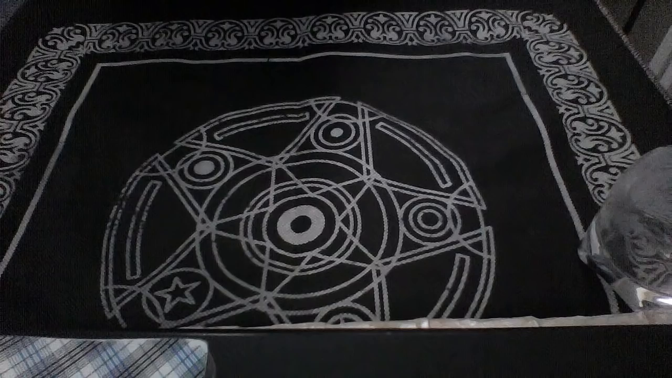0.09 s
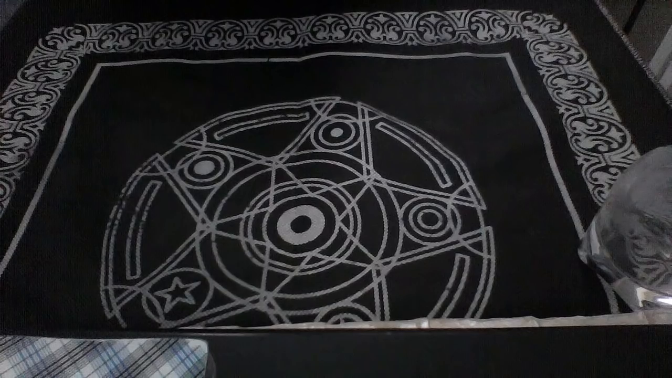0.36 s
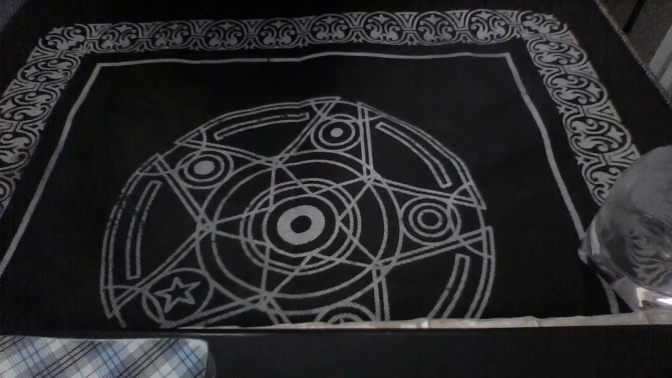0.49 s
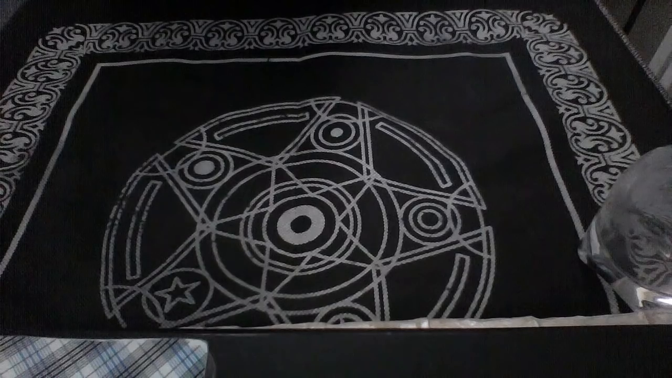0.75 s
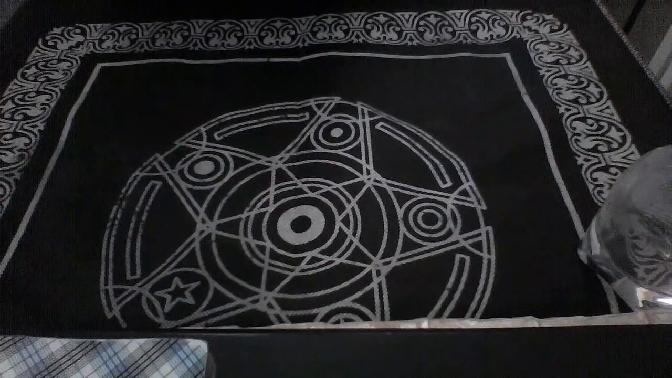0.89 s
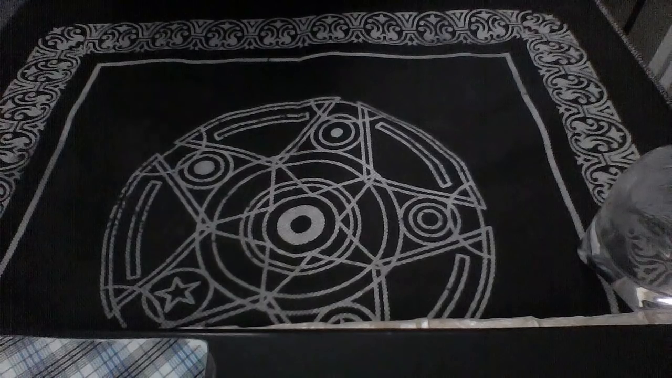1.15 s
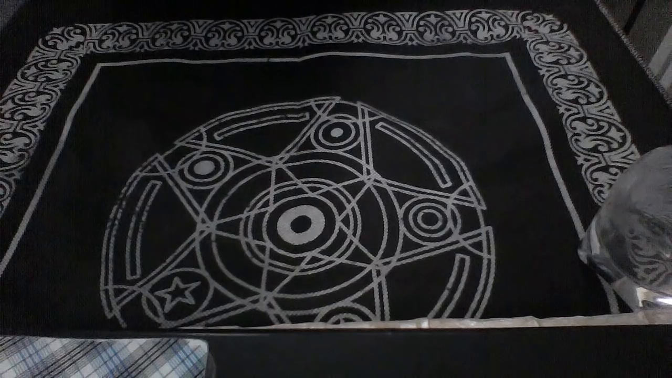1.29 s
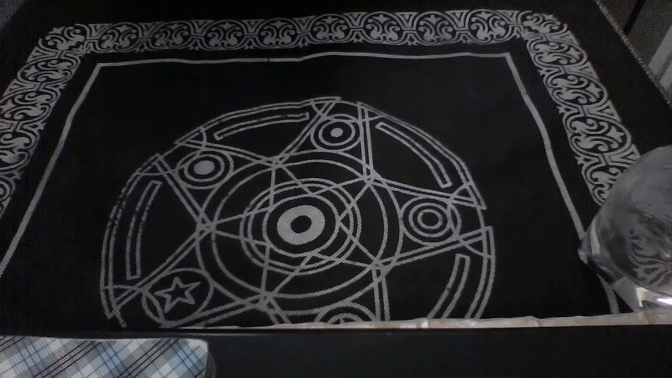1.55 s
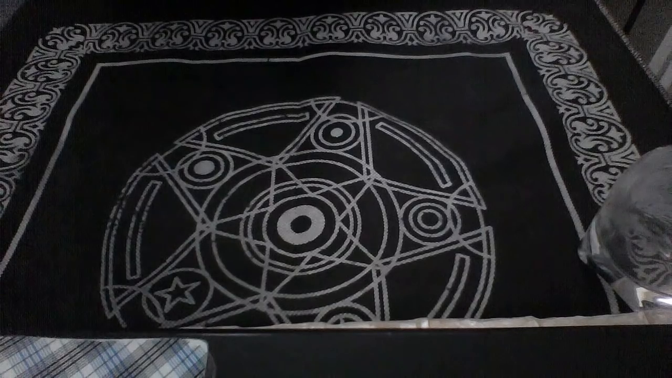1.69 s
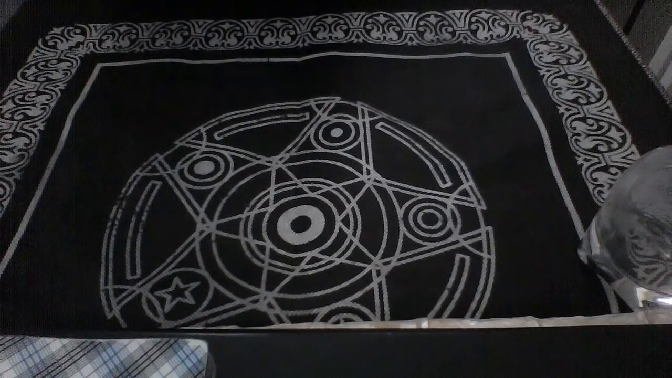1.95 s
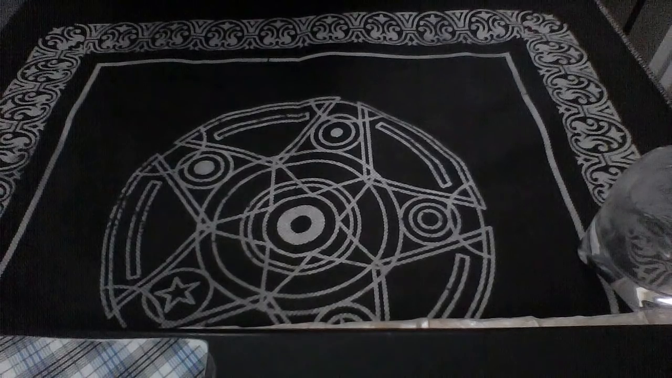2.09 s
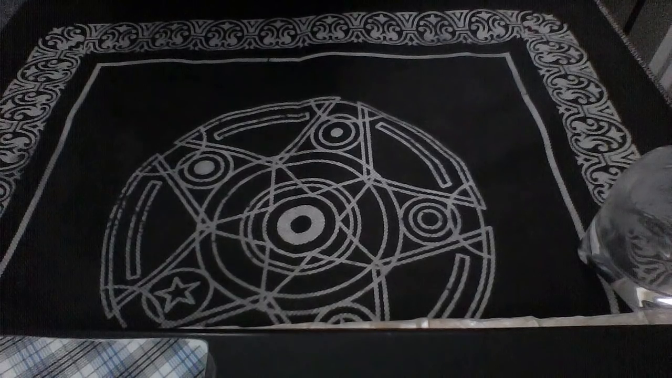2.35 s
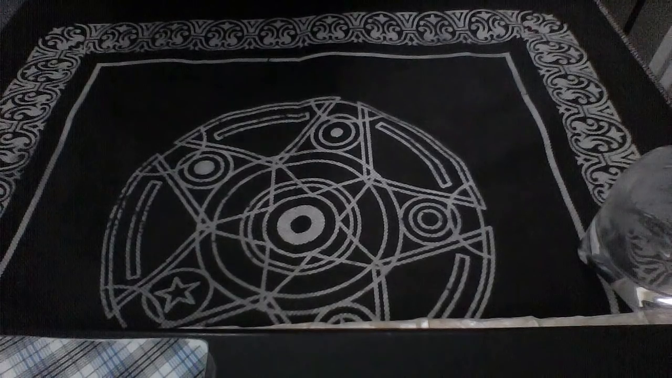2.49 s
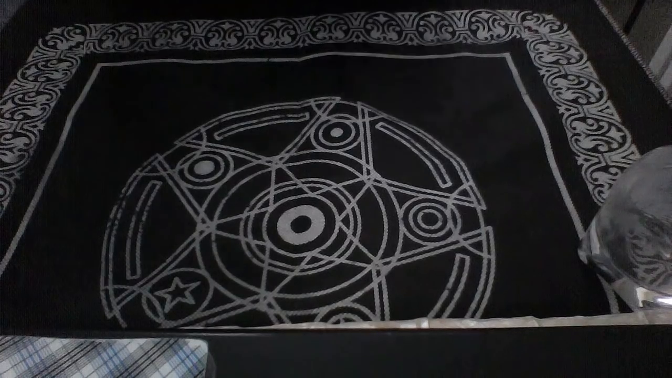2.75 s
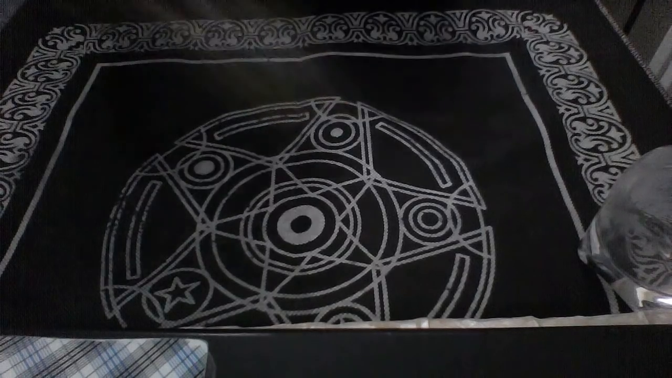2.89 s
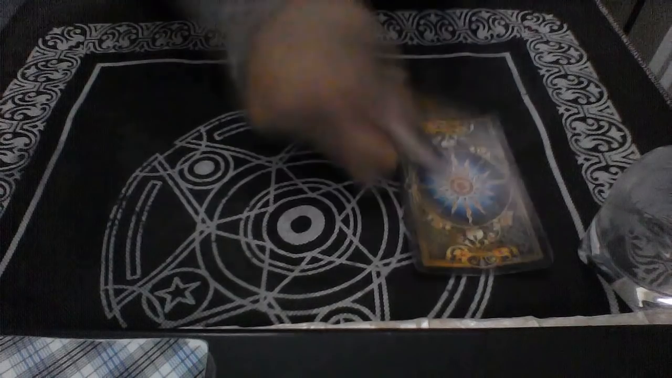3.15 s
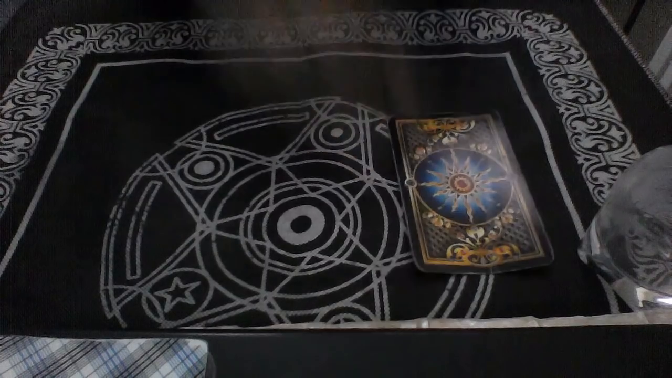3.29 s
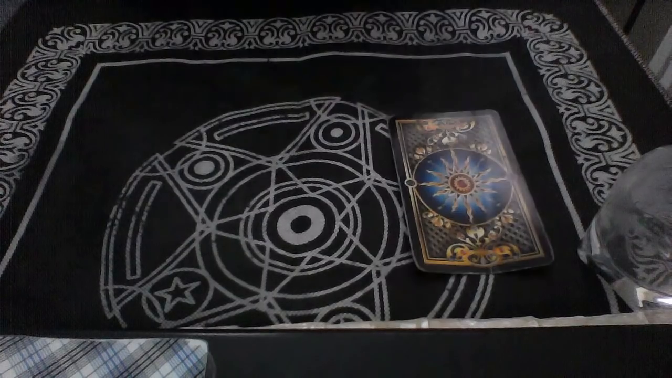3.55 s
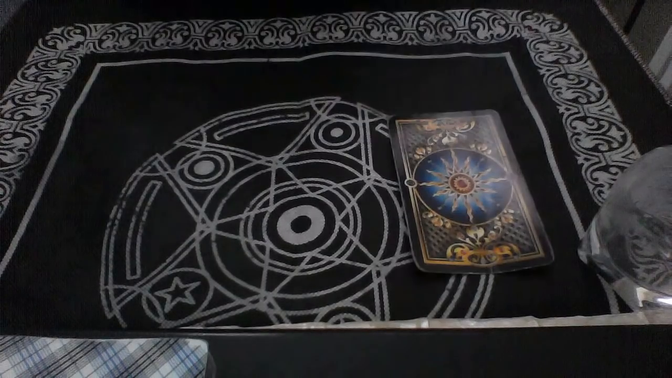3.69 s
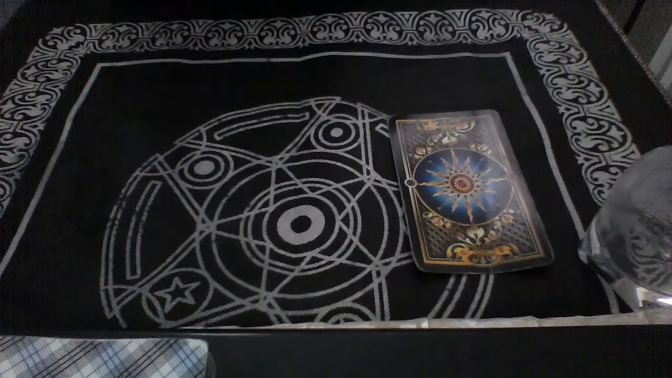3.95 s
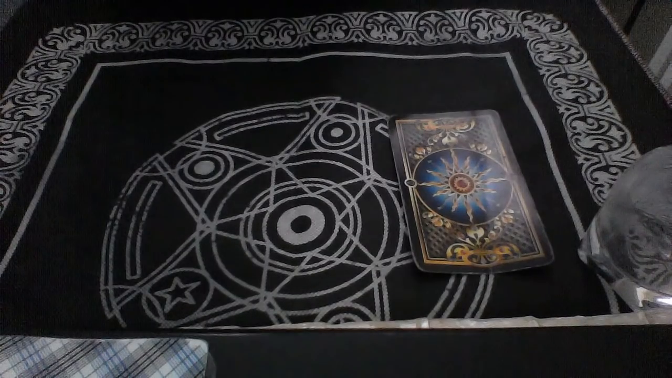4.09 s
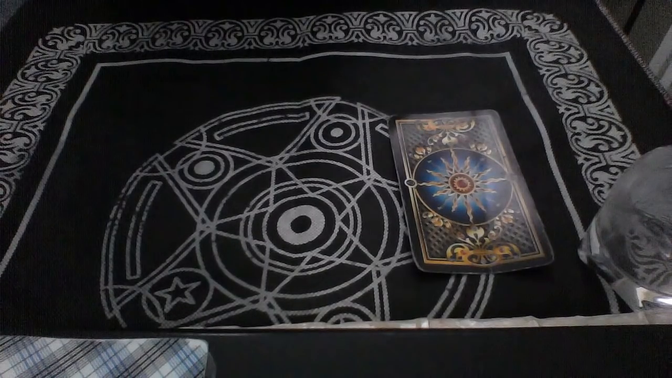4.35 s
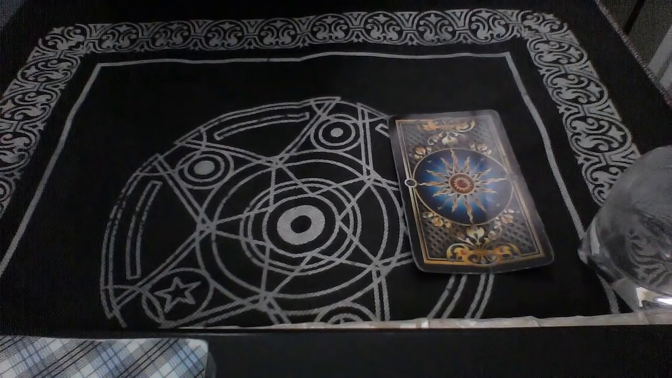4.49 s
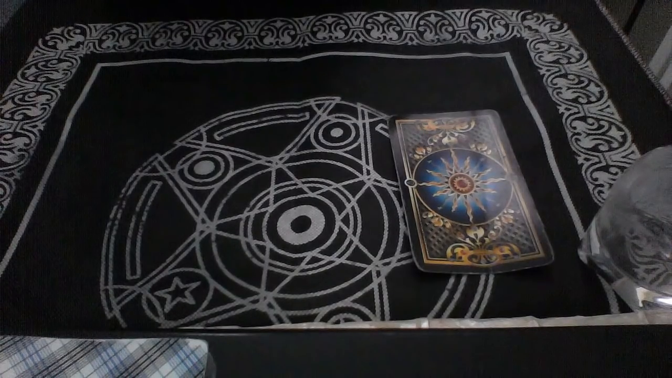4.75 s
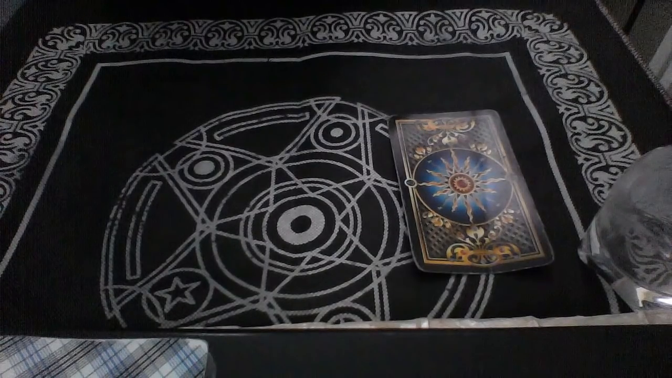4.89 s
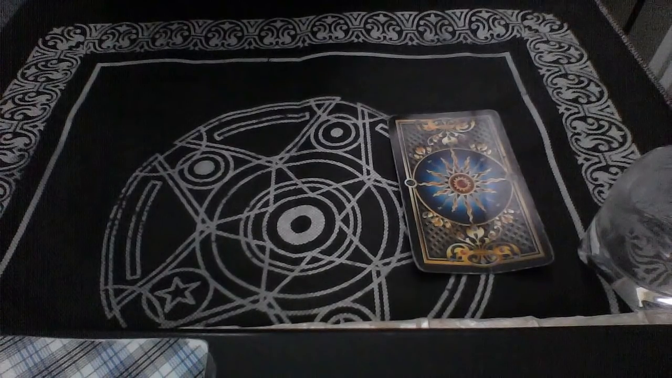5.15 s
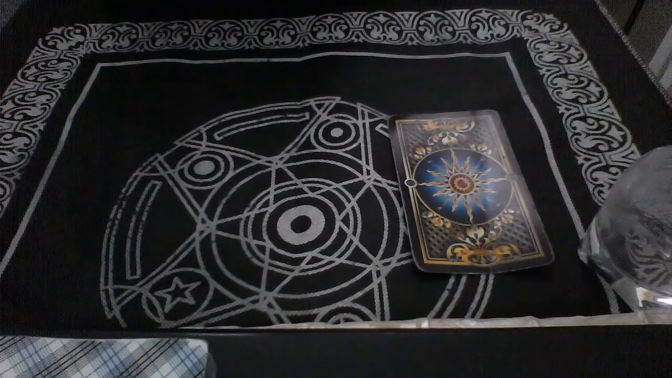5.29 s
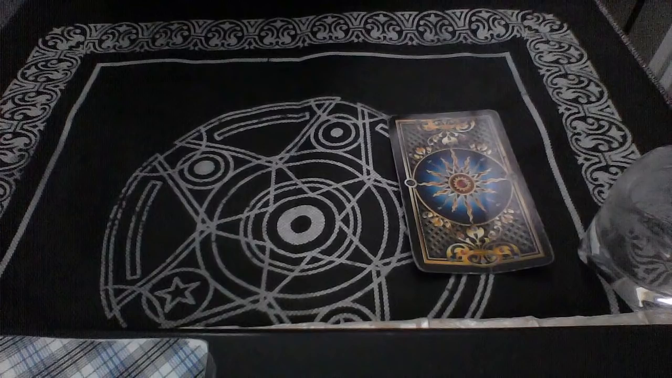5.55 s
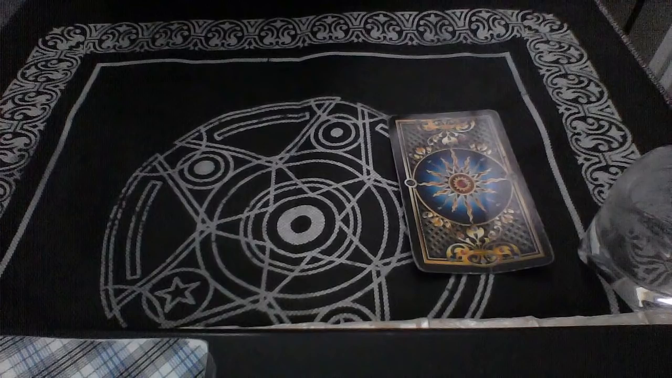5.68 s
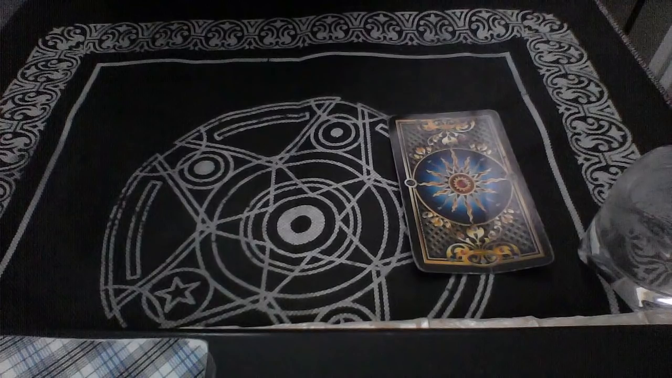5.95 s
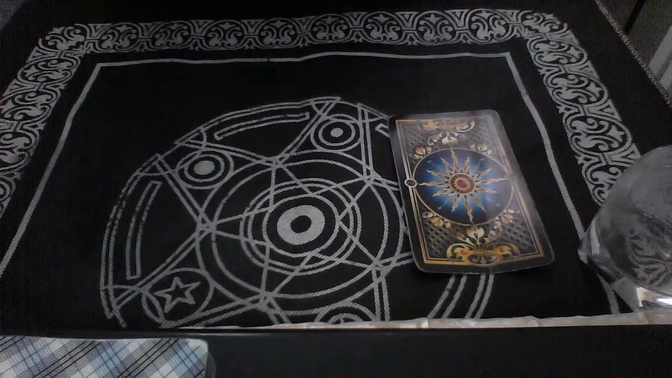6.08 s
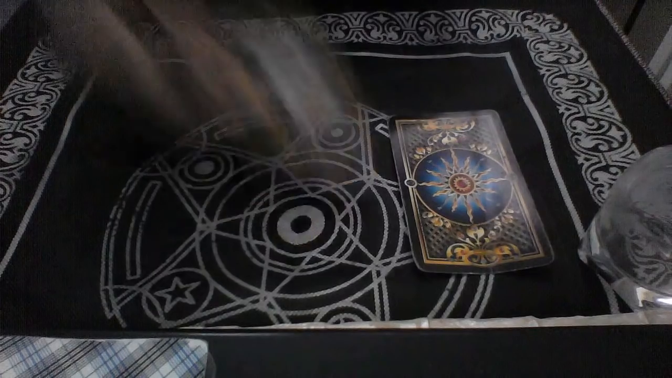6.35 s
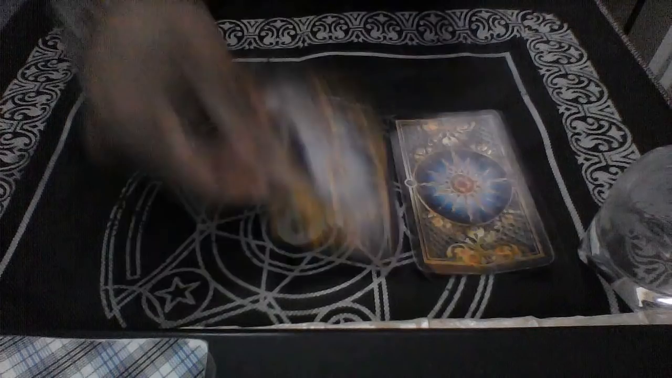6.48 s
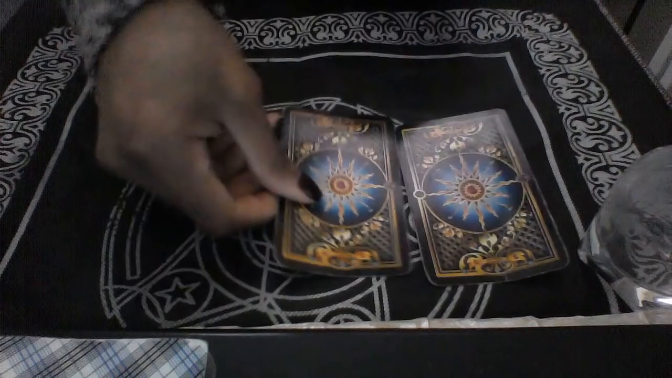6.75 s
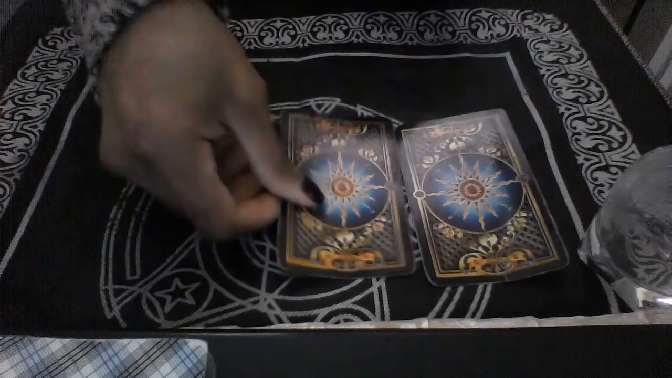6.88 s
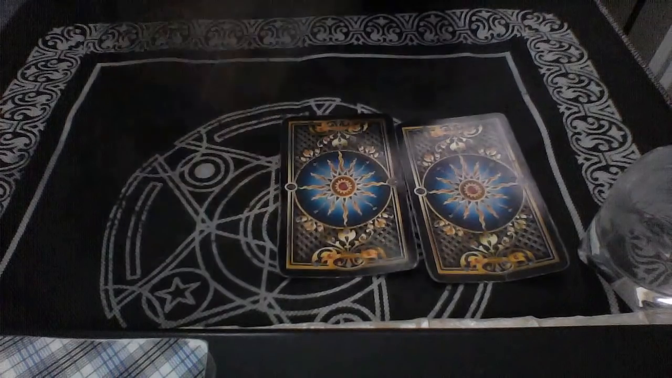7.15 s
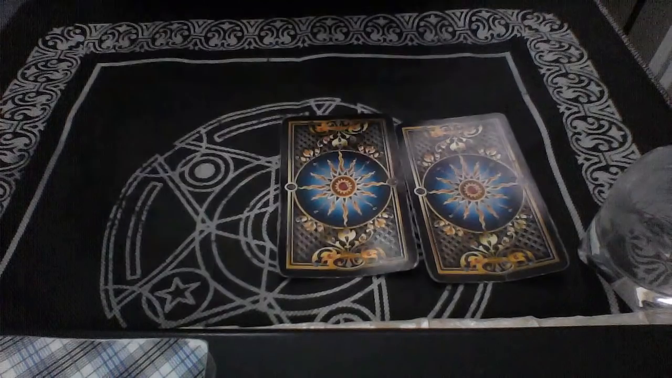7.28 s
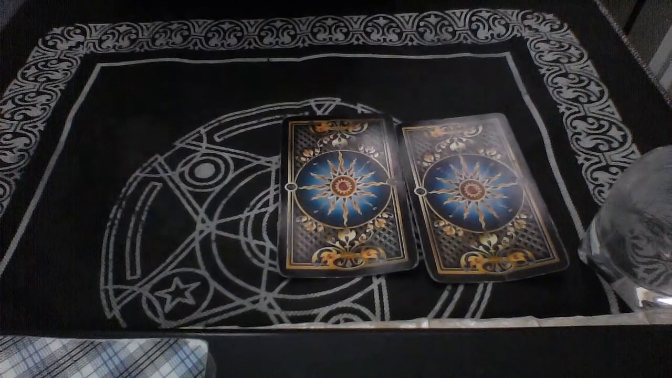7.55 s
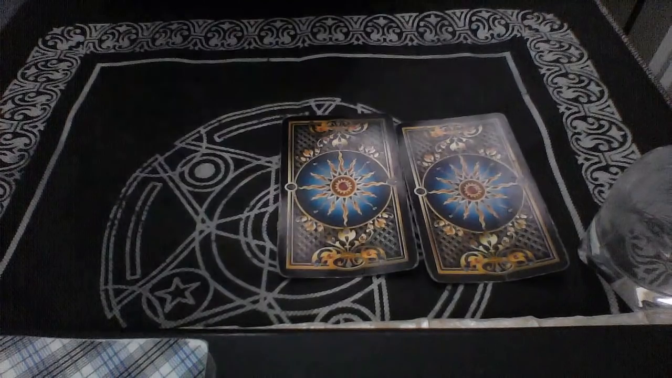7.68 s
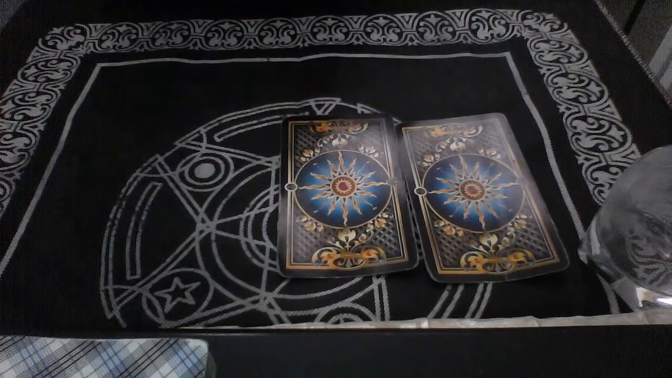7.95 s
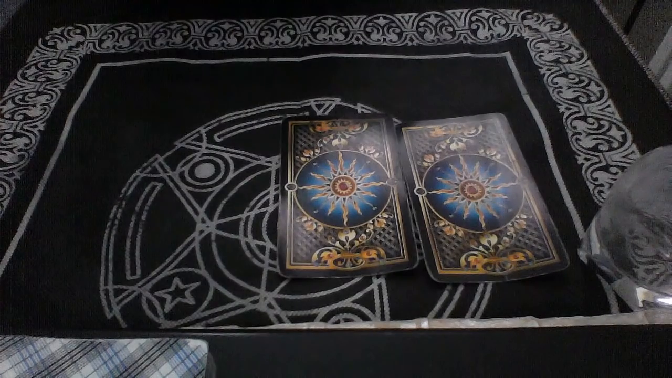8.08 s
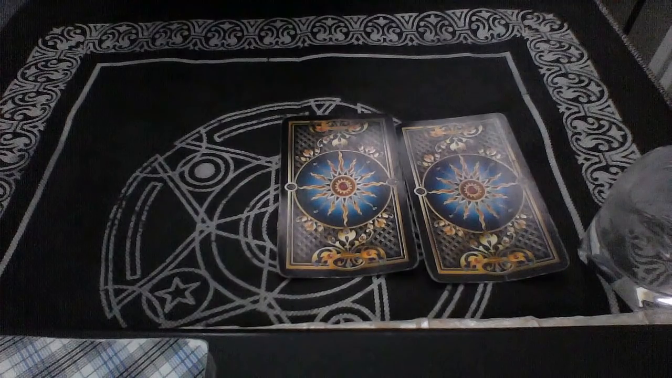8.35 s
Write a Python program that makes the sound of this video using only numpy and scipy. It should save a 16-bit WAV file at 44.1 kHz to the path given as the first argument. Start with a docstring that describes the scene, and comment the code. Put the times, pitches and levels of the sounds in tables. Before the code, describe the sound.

Steady soft fan whir and low rumble indoors. Close by, card edges tick, snap and knock unevenly, each with a brief woody ring, while packets rub with tiny scratchy hisses. A strong burst comes early, then a card is laid down, steady shuffling follows, another card is laid, a short lull passes, and a hard clack with a dull table boom leads into final clicks.

```python
"""Shuffling a deck of cards

Stiff cards are shuffled near a camera: edges snap and knock as a released card rings the deck in the hands.
Packets hiss as they slide over each other: noise full of tiny catches follows the speed of each stroke.
Soft pushes make a cloth-covered table top boom, as a sum of fading tones.
Behind it a computer fan whirs with a few steady tones, over low room rumble and a fitful rustle."""
import sys
import numpy as np
from scipy import signal
from scipy.fft import rfft, irfft, next_fast_len
from scipy.io import wavfile
from scipy.ndimage import uniform_filter1d, map_coordinates

SR = 44100
rng = np.random.default_rng(int(sys.argv[2]) if len(sys.argv) > 2 else 0)


def unload_wav(signal):
    """Save mono or channel-first audio to the path in sys.argv[1] as 16-bit WAV at rate SR, clipped to [-1, 1]."""
    wavfile.write(
        sys.argv[1],
        SR,
        np.round(np.clip(np.atleast_2d(signal).T, -1, 1) * 32767).astype(np.int16),
    )


N = 373527  # length of the scene in samples

# Fan hiss, its colour before overall scaling: (frequency [Hz], relative level [dB])
FAN_HISS = [(76, -47), (130, -25), (176, -15), (253, -6.5), (300, -17), (380, -7.5), (444, -13), (522, -12),
            (664, -7), (765, -9.5), (1290, -7.5), (1520, -9.5), (2010, -12), (2700, -15.5), (4000, -20),
            (7000, -22.5), (16000, -23)]
# Fan tones: (multiple of the shaft rate, average level [dB])
FAN_TONES = [(13, -54), (14, -57), (15, -61), (16, -57.5), (24, -62), (31, -64), (32, -62), (49, -65)]
# Low room rumble, its colour before overall scaling: (frequency [Hz], relative level [dB])
ROOM_RUMBLE = [(4.7, -52), (8.0, 0.5), (27, -4), (50, -10.5), (65, -12.5), (94, -11), (161, -27),
               (177, -34), (200, -42), (260, -47), (440, -120)]
# How long the room rings: (frequency [Hz], time to fall 60 dB [s])
ROOM_DECAY = [(200, 0.34), (1500, 0.16), (10000, 0.075)]
# Pushes on the table top: (time [s], strength [dB], contact length [s])
TABLE_PUSHES = [(.70, -27.5, 0.0068), (3.167, -20.5, 0.0017), (4.078, -34.5, 0.0032), (6.938, -13, 0.0024),
                (7.83, -10, 0.015), (8.062, -40.5, 0.0032)]
# Tones of the table top: (frequency [Hz], relative level [dB], time to fall 60 dB [s])
TABLE_MODES = [(61.7, -40, 0.16), (113.3, 1.5, 0.25), (212, 0, 0.11), (265, 0.5, 0.13), (318, 10.5, 0.059),
               (396, 5, 0.072)]
# Packets sliding: (start [s], length [s], fastest moment [share of length], level [dB], hiss centre [Hz])
CARD_SLIDES = [(0.083, 0.058, 0.49, -34, 1930), (0.616, 0.22, 0.21, -42, 1740),
               (0.706, 0.053, 0.11, -34.5, 1980), (0.851, 0.12, 0.43, -32, 2400),
               (0.972, 0.05, 0.85, -40.5, 2500), (1.268, 0.049, 0.17, -33.5, 1550),
               (1.487, 0.038, 0.25, -35.5, 2050), (1.516, 0.096, 0.042, -38, 1550),
               (1.599, 0.1, 0.4, -44.5, 1780), (1.772, 0.089, 0.63, -37.5, 1970),
               (1.854, 0.13, 0.11, -46, 1720), (2.193, 0.25, 1, -49.5, 2470),
               (2.59, 0.067, 0.57, -42.5, 1480), (2.664, 0.054, 0.05, -42, 1000),
               (2.716, 0.032, 0.11, -40, 1530), (2.815, 0.12, 0.5, -49.5, 4000),
               (3.062, 0.12, 0.7, -35, 2630), (3.412, 0.051, 0.83, -30, 2380),
               (3.649, 0.26, 0.18, -49.5, 3400), (3.973, 0.082, 0.84, -39, 2090),
               (4.055, 0.039, 0.46, -33.5, 1910), (4.272, 0.052, 0.3, -27, 2000),
               (4.327, 0.05, 0.52, -35, 1970), (4.492, 0.058, 0.74, -38, 1770),
               (4.561, 0.042, 0.37, -40, 3300), (4.595, 0.045, 0.6, -33, 1530),
               (4.789, 0.049, 0.2, -28, 1730), (4.85, 0.038, 0.48, -36, 1970),
               (5.028, 0.057, 0.25, -36.5, 2460), (5.092, 0.056, 0.89, -35.5, 2660),
               (5.3, 0.054, 0.31, -33.5, 2020), (5.336, .05, 0.96, -34.5, 2500),
               (5.572, 0.031, 0.12, -36.5, 1510), (5.608, 0.1, 0.29, -35, 2430),
               (5.657, 0.057, 0.26, -32.5, 1270), (5.969, 0.051, 0.35, -40.5, 1490),
               (6.093, 0.07, 0.93, -34.5, 2080), (6.873, 0.048, 0.44, -46, 2680),
               (7.195, 0.94, 0.071, -53, 3840), (7.496, 0.13, 0.52, -42, 1400),
               (7.593, 0.025, 0.44, -33, 2030), (7.795, 0.021, 0.53, -22.5, 1630),
               (7.818, 0.096, 0.069, -36, 1620), (8.038, 0.065, 0.42, -36.5, 2510),
               (8.124, 0.07, 0.51, -33.5, 1840), (8.342, 0.041, 0.9, -30.5, 2000),
               (8.383, 0.054, 0.091, -31.5, 1430)]
# Resonances of rubbing card surfaces: (frequency [Hz], width [Hz], level [dB])
CARD_SURFACE = [(1140, 300, -5), (1600, 250, -9)]
# Low body of the deck in the hands, heard in slides: (frequency [Hz], width [Hz], level [dB])
DECK_BODY = [(160, 253, 22), (460, 67, -10)]
# The deck's body under a blow: (frequency [Hz], width [Hz], average level [dB])
STRUCK_DECK = [(200, 110, -13.5), (389, 125, 3), (550, 210, -2)]
# Snapping or knocking edges: (time [s], card level [dB], card ring [Hz],
# body level against the card [dB], treble level against the card [dB])
CARD_SNAPS = [(0.093, -23, 1610, -8, -7), (0.114, -28, 1580, -5, 8), (0.714, -15, 1070, -7.5, 1.5),
              (0.891, -28, 1010, -21.5, -9), (0.919, -24, 1190, 1.5, -20), (0.949, -22, 1480, -19, -25),
              (1.278, -12, 2300, -15, -7), (1.285, -3, 1240, -13.5, -15), (1.334, -28, 1500, -20, -1),
              (1.492, -28, 1230, -21, -15), (1.513, -10.5, 1510, -21, -11), (1.523, -2, 2760, -30, -12),
              (1.525, -0.5, 1430, -19, -3), (1.563, -8.5, 1650, -35, -43), (1.598, -21.5, 1500, -14, -2),
              (1.629, -24, 1470, -12, -4), (1.658, -27, 1080, -23, 5), (1.8, -28, 975, -2, -2),
              (1.816, -24, 1260, 8, -3), (1.828, -16.5, 1200, -16, -3), (1.877, -25.5, 1600, -10, -3),
              (1.92, -24.5, 1240, -6, -25), (2.428, -23.5, 1370, -24, -6), (2.618, -31.5, 1530, 4, -15),
              (2.666, -2.5, 1000, -6, -43), (2.723, -19.5, 1460, -6, -5.5), (2.735, -25, 930, -6, -6),
              (3.134, -14.5, 3360, -30, -24), (3.167, -10.5, 2500, -14, -5), (3.194, -22.5, 3830, -22, -20),
              (3.353, -30, 2820, -15, 1), (3.43, -9.5, 1610, -20, -12), (3.449, -10, 2310, -11.5, -21),
              (3.678, -29, 1630, -14, -17), (4.029, -23, 1380, -5, -16), (4.071, -19.5, 1420, -3.5, -2),
              (4.087, -22, 1170, -22, -27), (4.282, -19.5, 1260, -22, -1), (4.294, -8.5, 2120, -26, -9),
              (4.308, -12.5, 4040, -14, -24), (4.36, -20, 1190, -11, -20), (4.524, -19.5, 1400, -8, -2.5),
              (4.627, -18.5, 1060, -3, -28), (4.793, -21.5, 1450, -1.5, -17), (4.805, -20, 1090, -12, -20),
              (4.864, -19, 2220, -6, -24), (4.879, -18.5, 1130, -6.5, -20), (5.041, -30.5, 935, 1, 5),
              (5.066, -16.5, 2020, -6, 1.5), (5.102, -24.5, 2800, -11, -5), (5.132, -27, 2780, -2, -20),
              (5.141, -24, 1110, 1, 0), (5.318, -19, 1020, -10, 0.5), (5.384, -14, 1100, -20, -19),
              (5.57, -15.5, 2260, -5.5, -18), (5.603, -26, 1130, -16, -5), (5.626, -25.5, 1460, 2, -11),
              (5.641, -18.5, 1250, -29, -23), (5.671, -9, 1150, -32, -34), (5.682, -18.5, 1130, -8, -23),
              (5.989, -12.5, 1160, -13, -1), (6.02, -17, 1130, -9, -9.5), (6.14, -15, 2220, -9.5, -31),
              (6.148, -13.5, 1180, -18, -17), (6.662, -26.5, 1330, -22, -23),
              (6.906, -4.5, 2870, -14.5, -34), (6.914, -16, 1520, -22, -11), (6.931, -1.5, 2770, -16, -4),
              (6.936, -10, 1130, -6, -1), (7, -35, 1560, -19, 7), (7.271, -28, 2140, -18, -14),
              (7.567, -25, 1060, -30, -15), (7.603, -31, 1430, 7, -16), (7.648, -21.5, 875, -33, -12),
              (7.795, -4, 1700, -37, -27), (7.804, 4, 1700, -26.5, -35), (7.824, 1, 1230, -23, -8),
              (7.83, -6.5, 2250, -7.5, -1), (7.834, -13.5, 1230, -1, 1), (7.847, -9.5, 1980, -7, -1.5),
              (7.886, -26, 1110, -1.5, -2), (8.064, -18, 2080, -6, -20), (8.095, -18.5, 1090, 1.5, -8),
              (8.143, -17, 1640, -21, -24), (8.155, -15.5, 1520, -6.5, -8), (8.343, -9.5, 1200, -13, -28),
              (8.355, -16.5, 1980, -13, 5.5), (8.381, -4.5, 1490, -17, -3.5), (8.411, -15, 1020, -24, -30)]

SHAFT_HZ = 39.03  # turns of the fan a second
DIP_START_S, DIP_FALL_S, DIP_RETURN_S, DIP_DB = 1.48, .08, 0.37, -6  # the background dips once
CAMERA_TOP_HZ = 15800
# Treble and body of a slide whose hiss sits at 2 kHz, and how they change per octave above that
FIZZ_DB, FIZZ_RISE_DB, RUB_BODY_DB, RUB_BODY_LOSS_DB = -18.5, 6, -1, 7
# A faint chance snap in each slide: average level over the slide's, typical ring, body and treble
TICK_DB, TICK_HZ, TICK_BODY_DB, TICK_TREBLE_DB = 9.5, 1350, -10, -26.5
# Chatter after a snap's release: time to fall 60 dB for a snap at -12.5 dB;
# that time loses DRIER dB for each dB a snap is louder, and gains as much for each dB softer
CHATTER_S, DRIER = 0.034, 0.19
OVERTONE, OVERTONE_DB = 1.89, -13  # the card's second mode: multiple of its ring, level at 0 dB treble
EDGE_DB, EDGE_FOLLOWS = -8, 0.17  # edge at 0 dB treble; share of treble dB that edge and overtone follow


def amp(db):
    """Turns a level in dB into a plain multiplier."""
    return 10 ** (np.asarray(db) / 20)


def unit(x):
    """Scales a sound to an average (rms) level of 1."""
    return x / np.sqrt(np.mean(x ** 2) + 1e-20)


def top(x):
    """Scales a sound so that its highest peak is 1."""
    return x / np.abs(x).max()


def along(points, hz):
    """Reads a value between (frequency, value) points on a log frequency axis."""
    f, v = np.transpose(points)
    return np.interp(np.log(hz + 1), np.log(f + 1), v)


def wobble(rate):
    """A smooth random curve with `rate` random points a second."""
    points = rng.standard_normal(int(N * rate / SR) + 4)
    return map_coordinates(points, [np.arange(N) * rate / SR])


def filtered(x, response):
    """Passes a sound through a filter given as a function of frequency."""
    m = next_fast_len(x.shape[-1] + 8192)
    hz = np.fft.rfftfreq(m, 1 / SR)
    return irfft(rfft(x, m) * response(hz), m)[..., :x.shape[-1]]


def peak(f, hz, width):
    """One resonance: passes `hz` at full level and rings on after a blow, longer when narrow."""
    return 1j * f * width / (hz * hz - f * f + 1j * f * width)


def peaks(f, rows):
    """Several resonances added with alternating signs."""
    return sum((-1) ** k * amp(db) * peak(f, hz, width) for k, (hz, width, db) in enumerate(rows))


def add(track, s, sound):
    """Mixes a sound into a track at s seconds."""
    part = track[round(s * SR):][:len(sound)]
    part += sound[:len(part)]


def fan_tones(t):
    """The turning shaft hums at multiples of its rate, with slightly unsteady speed and level."""
    turn = 2 * np.pi * SHAFT_HZ * t + .04 * wobble(2)
    tones = np.zeros(N)
    for multiple, db in FAN_TONES:
        level = np.sqrt(2) * amp(db + 1.2 * wobble(2))
        tones += level * np.sin(multiple * turn)
    return tones


def background_level(t):
    """One dip in level: a quick fall, then a slower return."""
    fall = np.clip((t - DIP_START_S) / DIP_FALL_S, 0, 1)
    recovery = np.exp(-np.maximum(t - DIP_START_S - DIP_FALL_S, 0) / DIP_RETURN_S)
    return amp(DIP_DB * fall * recovery)


def air():
    """Fan hiss, room rumble and a low rustle are coloured noise with wandering levels, beside the fan tones."""
    t = np.arange(N) / SR
    hiss = unit(filtered(rng.standard_normal(N), lambda f: amp(along(FAN_HISS, f))))
    rumble = unit(filtered(rng.standard_normal(N), lambda f: amp(along(ROOM_RUMBLE, f))))
    rustle = unit(filtered(rng.standard_normal(N), lambda f: peak(f, 382, 130) ** 2))
    rustle = rustle * amp(5 * wobble(9))  # fitful swelling
    fan = amp(-44 + 0.23 * wobble(16)) * hiss + fan_tones(t)
    low = amp(-36 + 2.7 * wobble(3.7)) * rumble + amp(-55) * rustle
    return background_level(t) * (fan + low)


def room(x):
    """Each frequency of the room's answer dies at its own speed; the answer changes as the hands move."""
    out, hop = np.zeros(N), SR // 4  # a new answer every quarter second
    for start in range(0, N, hop):
        hz, t, z = signal.stft(rng.standard_normal(SR // 3), SR, nperseg=256)
        decay = amp(-60 * t / along(ROOM_DECAY, hz)[:, None])
        tail = signal.istft(z * decay, SR, nperseg=256)[1]
        answer = signal.fftconvolve(x[start:start + hop], tail / np.linalg.norm(tail))
        add(out, start / SR + .004, answer)  # 4 ms later
    return out


def table():
    """A soft push sets the table top booming; the top radiates little below its first mode."""
    out, t = np.zeros(N), np.arange(SR // 2) / SR
    ring = sum(amp(db - 60 * t / t60) * np.sin(2 * np.pi * hz * t) for hz, db, t60 in TABLE_MODES)
    for s, db, contact in TABLE_PUSHES:
        push = np.hanning(max(round(contact * SR), 3))  # a longer contact sounds duller
        add(out, s, amp(db) * np.convolve(ring, push / push.sum()))
    return filtered(out, lambda f: (1j * f / (45 + 1j * f)) ** 2)


def slide(length, share, db, hiss_hz):
    """Friction: hiss full of tiny catches, swelling and fading with the speed of the stroke."""
    n = round(max(length, .01) * SR)
    octaves = np.log2(hiss_hz / 2000)
    fizz_db = FIZZ_DB + FIZZ_RISE_DB * octaves
    body_db = RUB_BODY_DB - RUB_BODY_LOSS_DB * octaves
    # grip changes quickly (smoothed over 30 samples) and more slowly (150 samples)
    quick_grip = unit(uniform_filter1d(rng.standard_normal(n), size=30))
    slow_grip = unit(uniform_filter1d(rng.standard_normal(n), size=150))
    catches = amp(4.4 * (quick_grip + .4 * slow_grip)) * rng.standard_normal(n)
    rub = unit(filtered(catches, lambda f: (1 + peaks(f, CARD_SURFACE)) * peak(f, hiss_hz, 1.67 * hiss_hz) ** 2))
    fizz = unit(filtered(catches, lambda f: peak(f, 6000, 9000) ** 2))
    body = unit(filtered(catches, lambda f: peaks(f, DECK_BODY)))
    speed = np.interp(np.arange(n) / n, [0, np.clip(share, .03, .97), 1], [0, 1, 0])
    return amp(db) * speed ** 0.87 * (rub + amp(fizz_db) * fizz + amp(body_db) * body)


def slides():
    """Places the friction of every packet that slides over another."""
    out = np.zeros(N)
    for s, *stroke in CARD_SLIDES:
        add(out, s, slide(*stroke))
    return out


def snap(db, ring_hz, body_db, treble_db):
    """A lead-in, a sharp release, then chatter ring card, edge and deck body under a dry treble tick."""
    t = np.arange(SR // 10) / SR
    lead = .005  # seconds before the release
    release = -np.exp(-((t - lead) / .00004) ** 2)
    crack = amp(-60 * np.abs(t - lead) / .007)  # 60 dB down 7 ms either side of the release
    chatter_s = CHATTER_S * amp(-DRIER * (db + 12.5))
    chatter = 0.58 * np.minimum(t / lead, 1) ** 3 * amp(-60 * np.maximum(t - lead, 0) / chatter_s)
    noise = rng.standard_normal((3, len(t)))
    sharp = 1.75 * release + noise[0] * crack
    card_chatter, edge_chatter = noise[1] * chatter, noise[2] * chatter

    # the deck's body answers a little differently each time
    chances = rng.standard_normal(len(STRUCK_DECK))
    held = [(hz, width, level + 3 * chance) for (hz, width, level), chance in zip(STRUCK_DECK, chances)]
    overtone = amp(OVERTONE_DB + EDGE_FOLLOWS * treble_db)

    def soft(f):
        """A bending card cannot push faster than its own ring, so the treble is rounded off."""
        return 1 / (1 + 1j * f / (1.71 * ring_hz)) ** 2

    def ring(f):
        """The card's main ring and its second mode."""
        second = peak(f, OVERTONE * ring_hz, 0.41 * ring_hz) ** 2
        return peak(f, ring_hz, 0.25 * ring_hz) * soft(f) - overtone * second

    def struck(f):
        """The ring under a sharp release, with a broad, short-lived part added."""
        return ring(f) + 0.2 * peak(f, ring_hz, 1.8 * ring_hz) * soft(f)

    card = top(filtered(sharp, struck) + filtered(card_chatter, ring))
    body = top(filtered(sharp + card_chatter, lambda f: peaks(f, held) * soft(f)))
    edge = top(filtered(sharp + 0.14 * edge_chatter, lambda f: peak(f, 3310, 3300) ** 2))
    tick = top(filtered(sharp + 1.03 * release + 0.12 * edge_chatter, lambda f: peak(f, 4550, 10000) ** 2))
    edge_db = EDGE_DB + EDGE_FOLLOWS * treble_db
    return amp(db) * (card + amp(body_db) * body + amp(edge_db) * edge + amp(treble_db) * tick)


def snaps():
    """The clear snaps, and one faint chance snap around the fastest moment of every slide."""
    out = np.zeros(N)
    for s, *sound in CARD_SNAPS:
        add(out, s - .003, snap(*sound))  # starts early, to make room for the lead-in
    for s, length, share, db, _ in CARD_SLIDES:
        when, (size, pitch) = rng.random(), rng.standard_normal(2)
        moment = share + 0.6 * (when - share)
        tick_db = db + TICK_DB + 3 * size
        tick_hz = TICK_HZ * np.exp(.2 * pitch)
        add(out, s + moment * length, snap(tick_db, tick_hz, TICK_BODY_DB, TICK_TREBLE_DB))
    return out


def scene():
    """Mixes cards, their answer from the room, the table and the background."""
    cards = slides() + snaps()
    return (air() + amp(-15) * room(cards) + table() + cards)[None]


def record(dry):
    """The camera rounds off the highest peaks and keeps nothing above its band limit."""
    rounded = dry / (1 + np.abs(dry / .98) ** 6) ** (1 / 6)
    return filtered(rounded, lambda hz: hz < CAMERA_TOP_HZ)


dry = scene()
out = record(dry)
unload_wav(out)
```